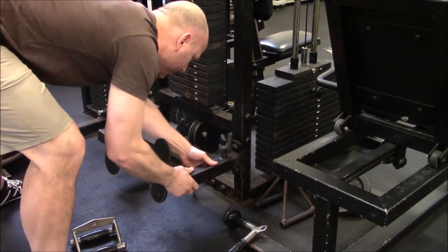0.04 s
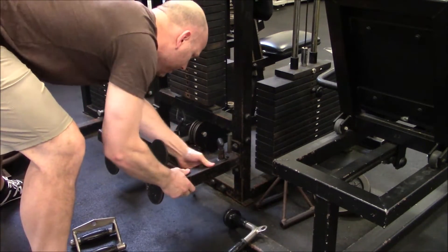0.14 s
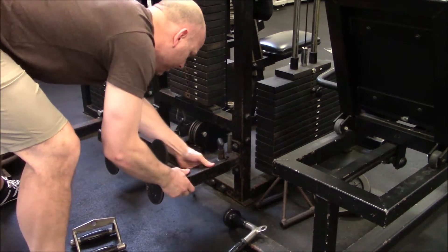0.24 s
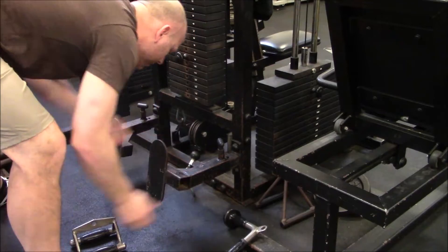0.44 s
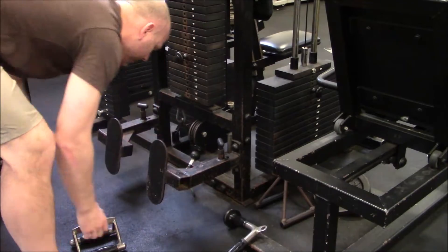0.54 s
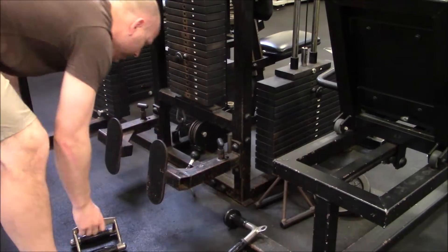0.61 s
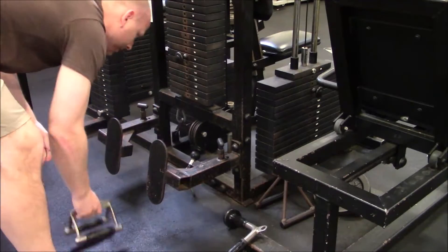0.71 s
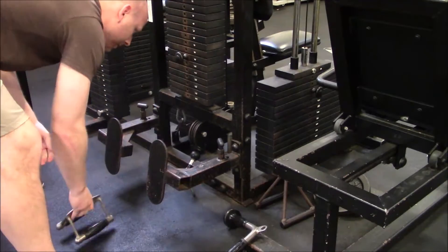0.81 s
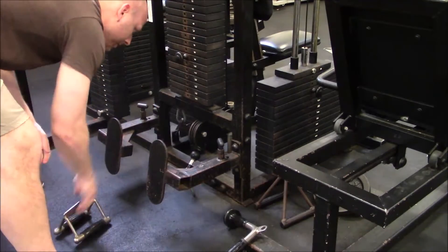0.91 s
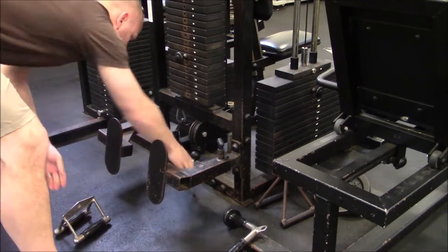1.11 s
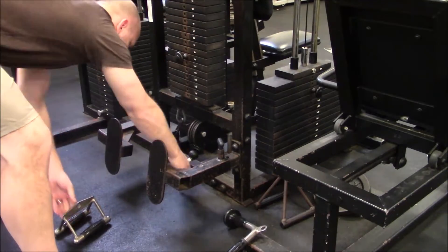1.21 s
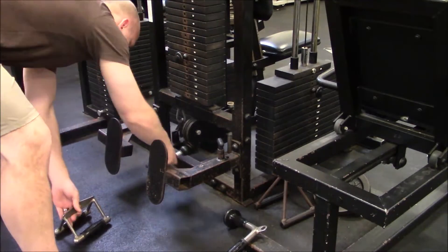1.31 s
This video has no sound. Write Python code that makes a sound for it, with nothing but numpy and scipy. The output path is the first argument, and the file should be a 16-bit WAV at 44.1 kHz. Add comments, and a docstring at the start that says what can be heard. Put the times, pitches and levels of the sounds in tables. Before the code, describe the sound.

One loud, rattling metal clank rings out nearby in a gym as a weight machine's bar scrapes and drops home. A quieter bump of a handle on the rubber floor and faint clinks follow over steady, low-level ventilation.

```python
"""In a gym, over steady ventilation, a steel bar on a weight machine is knocked, scrapes and squeaks,
then drops home with a loud, rattling clank. The blow sets the frame ringing and the room answers.
A cable handle bumps twice on the rubber floor, which dulls it to a clack, and small fittings tick.
Each hit is a short burst of noise plus the fading tones of the part that was struck."""
import sys
import numpy as np
from scipy import signal
from scipy.fft import rfft, irfft
from scipy.io import wavfile
from scipy.ndimage import uniform_filter1d

SR = 44100
rng = np.random.default_rng(int(sys.argv[2]) if len(sys.argv) > 2 else 0)


def wrap_up_sound(samples):
    """Save the sound to the file named by the first command line argument, as 16-bit audio."""
    columns = np.atleast_2d(samples).T
    # keep every value between -1 and 1, then stretch to whole-number steps
    tamed = np.clip(columns, -1, 1)
    steps = np.round(tamed * 32767).astype(np.int16)
    wavfile.write(sys.argv[1], SR, steps)


N = 59535
T = np.arange(N) / SR
HZ = np.fft.rfftfreq(N, 1 / SR)


def amp(db):
    """Turns decibels into a gain."""
    return np.exp(np.asarray(db) * np.log(10) / 20)


def curve(hz, values):
    """Joins a few points into a curve over all frequencies."""
    return np.interp(np.log(HZ + 1), np.log(np.asarray(hz) + 1), values)


def noise(colour):
    """Noise of level 1; its colour says how strong the lows and highs are next to each other."""
    x = irfft(rfft(rng.standard_normal(N)) * amp(curve(*np.transpose(colour))), N)
    return x / x.std()


def envelope(start, rise, fade):
    """Builds up for `rise` seconds, then drops 60 dB every `fade` seconds."""
    out, first = np.zeros(N), max(int(start * SR), 0)
    t = np.maximum(T[first:first + int((rise + 2 * fade) * SR)] - start, 0)
    out[first:first + len(t)] = np.minimum(t / rise, 1) * amp(-60 * np.maximum(t - rise, 0) / fade)
    return out


def burst(start, db, colour, rise, fade):
    """The brief, noisy shaking from one hit."""
    return amp(db) * noise(colour) * envelope(start, rise, fade)


def tail(start, db, colour, decay):
    """Countless tones and echoes blur into noise; each band builds and dies at its own speed."""
    spectrum, centres = rfft(noise(colour)), [row[0] for row in decay]
    return amp(db) * sum(irfft(spectrum * curve(centres, band), N) * envelope(start, rise, fade)
                         for band, (_, rise, fade) in zip(np.eye(len(decay)), decay))


def ring(start, db, tones, rise, waver=.7):
    """The clear tones of struck metal; echoes make each one waver."""
    out, steps, drift_s = np.zeros(N), T[::128], .03
    for hz, level, fade in tones:
        jitter = rng.standard_normal((2, len(steps)))
        drift = signal.lfilter([1], [1, -np.exp(-steps[1] / drift_s)], jitter)
        drift = uniform_filter1d(drift, size=5)
        echoes = (drift[0] + 1j * drift[1]) / drift.std() / np.sqrt(2)
        wobble = (1 + waver * echoes) / np.hypot(1, waver)  # its size sets level, its angle shifts phase
        phase = 2 * np.pi * (hz * T + rng.random()) + np.interp(T, steps, np.unwrap(np.angle(wobble)))
        swell = np.interp(T, steps, abs(wobble))
        out += amp(db + level) * swell * np.sin(phase) * envelope(start, rise, fade)
    return out


def repeat(rows, sound):
    """Plays one sound at each row of t/s, level/dB."""
    return sum(amp(db) * np.pad(sound, (round(s * SR), 0))[:N] for s, db in rows)


def low_cut(x, hz, order=4):
    """Takes the bass away."""
    return signal.sosfilt(signal.butter(order, hz, "highpass", fs=SR, output="sos"), x)


# colour of the moving air, and its stereo width (side compared with middle): f/Hz, level/dB
AIR_COLOUR = [(25, -28.5), (50, -20), (85, -13), (125, -4), (170, -1), (230, 0.5), (500, 0.5), (800, -2.5),
              (1100, -6.5), (2300, -13), (3700, -14), (4600, -20), (6500, -18), (10000, -22.5),
              (16000, -25)]
AIR_WIDTH = [(30, -11.5), (150, -22), (500, -15), (2000, -8.5), (6000, -7.5), (15000, -14.5)]
def ventilation():
    """Air rushes softly and steadily, a little different in each ear."""
    mid = noise(AIR_COLOUR)
    side = irfft(rfft(noise(AIR_COLOUR)) * amp(curve(*np.transpose(AIR_WIDTH))), N)
    return amp(-57) * np.array([mid + side, mid - side])


# colour of the weight plates' long ring: f/Hz, level/dB
PLATE_COLOUR = [(60, -39), (250, -7), (540, 10), (900, 3), (1300, 4), (2200, -4), (3200, -7), (3750, -7),
                (4600, -17.5), (5850, -2), (7200, -10.5), (7650, -10), (8100, -7.5), (9500, -12),
                (15000, -22.5)]
# how it dies away: f/Hz, rise/s, fade/s
PLATE_DECAY = [(297.7, 0.032, 0.89), (1570, 0.093, 0.63), (5830, 0.035, 1.265), (14000, 0.044, .75)]
def plates(start, db):
    """The weight plates ring on in the room after being moved or hit."""
    return tail(start, db, PLATE_COLOUR, PLATE_DECAY)


# when the bar is knocked: t/s, level/dB
KNOCKS = [(0.0197, -26.5)]
# colours of the knock and of its echo: f/Hz, level/dB
KNOCK_COLOUR = [(60, -38), (400, -36), (1000, -24), (1900, 3), (2800, 5.5), (3600, -1), (5000, 5),
                (9000, -5.5), (13200, 1), (16000, -13)]
KNOCK_ECHO = [(60, -49), (200, -9.5), (380, -0.5), (700, 1.5), (1300, 0), (1600, -1.5), (1860, 13.5),
              (2060, 0.5), (2290, 8), (2900, -1), (3700, 0.5), (4700, -9.5), (8500, -3.5), (13000, -21),
              (16000, -22.5)]
# how the room's echo dies away: f/Hz, rise/s, fade/s
ROOM_DECAY = [(149.3, 0.061, 1), (453, 0.065, 0.61), (1500, 0.0012, 0.22), (4000, 0.0035, 0.3),
              (8000, .004, 0.16), (15000, .004, .27)]
# the bar's own tones: f/Hz, level/dB, fade/s
BAR_TONES = [(1320, -46, 0.46), (1836, -27.5, 0.085), (1905, -42.5, .22), (2250, -35, .09),
             (2470, -38, 0.091), (3490, -25, 0.026), (4300, -54.5, 0.3), (8240, -35, 0.044),
             (10030, -47.5, 0.19), (10700, -52.5, .28), (11560, -53, .11), (11960, -54, .22),
             (12960, -33, 0.035)]
def knock():
    """A light knock makes the bar ring and the room answer."""
    tones = ring(KNOCKS[0][0], db=0, tones=BAR_TONES, rise=.0022)
    hit = burst(0, 0, KNOCK_COLOUR, rise=.0012, fade=.031)
    return tones + repeat(KNOCKS, hit + tail(0, -5.5, KNOCK_ECHO, ROOM_DECAY))


# steel rubbing on steel: t/s, length/s, first f/Hz, last f/Hz, level/dB
SQUEAKS = [(0.051, 0.055, 3880, 4110, -46.5), (0.0655, 0.013, 3340, 3730, -39.5),
           (0.173, 0.0065, 3350, 3400, -33), (.176, 0.017, 3980, 4600, -40.5),
           (.188, 0.015, 3000, 2735, -38.5)]
def squeaks():
    """Steel sticks and slips very fast, making short chirps with a shaky pitch."""
    out = np.zeros(N)
    for start, length, first_hz, last_hz, db in SQUEAKS:
        progress = np.clip((T - start) / length, 0, 1)
        waver = uniform_filter1d(rng.standard_normal(N), size=60)
        hz = (first_hz + (last_hz - first_hz) * progress) * (1 + .016 * waver / waver.std())
        swell = 2 * np.sqrt(progress * (1 - progress))
        out += amp(db) * swell * np.sin(2 * np.pi * np.cumsum(hz) / SR)
    return out


# where the sliding bar catches: t/s, relative level/dB, fade/s
SCRAPES = [(.067, -38, 0.034), (.1648, -35, .025), (0.1705, -34.5, 0.03), (0.177, -40.5, 0.105),
           (.189, -38, .12), (0.1993, -24, 0.045)]
# colour of a scrape: f/Hz, level/dB
SCRAPE_COLOUR = [(100, -34), (700, -2.5), (1700, -0.5), (2400, -3), (3000, -4), (3450, 6.5), (4300, -4),
                 (5500, -9.5), (6750, 0), (7800, -8.5), (9500, -8.5), (12500, -12.5), (16000, -21.5)]
def scrapes():
    """Each catch of the sliding bar gives a short rasp."""
    return sum(burst(s, db + 2, SCRAPE_COLOUR, rise=.0025, fade=fade) for s, db, fade in SCRAPES)


# two hard hits, then the bounces: t/s, level/dB
CLANKS = [(.2045, -5.5), (.2062, -6.5), (.2100, -22), (.2222, -19.5), (.2247, -20), (.2283, -17.5),
          (.2350, -23), (.2420, -20), (.2490, -17.5)]
# colours of a hit, a bounce, the machine's blurred ring and the thump: f/Hz, level/dB
HIT_COLOUR = [(60, -27.5), (300, -25), (600, -12), (1100, -4), (2300, -3.5), (4200, 1.5), (6500, 6.5),
              (10000, 2), (13800, 3), (15200, -2)]
BOUNCE_COLOUR = [(60, -33.5), (300, -32.5), (1200, 8.5), (4500, 7.5), (5900, 13), (7800, 8), (10000, -18),
                 (15500, 5.5)]
BODY_COLOUR = [(40, -55.5), (130, -48), (230, -22), (450, -6), (750, -9.5), (1050, -11), (1300, 0.5),
               (1800, -5.5), (2750, -5), (3150, -8.5), (3800, -7), (5050, -10), (5500, -0.5), (5950, 6),
               (6350, -3), (6750, 1), (7250, -8.5), (7600, 4), (8100, -11), (8700, -3.5), (10500, -7.5),
               (13000, -7.5), (14200, -13.5), (15000, -9.5), (15800, -16)]
THUMP_COLOUR = [(30, -29.5), (55, -22), (110, -31.5), (200, -4.5), (280, 0.5), (450, 4), (900, -12.5),
                (3000, -34)]
# how the blurred ring dies away: f/Hz, rise/s, fade/s
BODY_DECAY = [(150, 0.053, 0.25), (450, 0.037, 0.26), (1278, 0.033, 0.38), (3000, 0.02, 0.33),
              (5900, 0.025, 0.44), (10030, 0.026, 0.48), (14680, 0.013, 0.5)]
# low tones of the weight and clear tones of the frame: f/Hz, relative level/dB, fade/s
WEIGHT_TONES = [(250, -43, .09), (290, -34, .1), (446, -27, .17)]
FRAME_TONES = [(525, -37, .9), (790, -37, .8), (944, -35, .45), (1254, -28, .42), (1298, -28, .45),
               (2235, -50, 1.5), (2774, -32, .36), (2828, -32, .36), (3445, -34, .32), (3656, -49.5, 2.2),
               (3692, -40, .7), (3859, -30, .38), (5734, -28, .46), (5955, -27, .48), (6103, -27, .38),
               (7547, -26, .32), (8612, -28, .33), (8975, -29, .33), (9673, -31, .34), (11165, -33, .3)]
def clank():
    """Steel lands on steel and rattles; the machine rings and the weight settles with a thump."""
    start = CLANKS[0][0]
    hits = sum(burst(s, db, HIT_COLOUR, rise=.0002, fade=.018) for s, db in CLANKS[:2])
    rattle = sum(burst(s, db, BOUNCE_COLOUR, rise=.002, fade=.016) for s, db in CLANKS[2:])
    crash = burst(start, -17, HIT_COLOUR, rise=.00068, fade=.088)
    body = tail(start, -12.5, BODY_COLOUR, BODY_DECAY) + plates(start, db=-27.5)
    thump = burst(.232, -35, THUMP_COLOUR, rise=.0061, fade=.058)
    thump += ring(.218, db=-1, tones=WEIGHT_TONES, rise=.039)
    frame = ring(start, db=.6, tones=FRAME_TONES, rise=.0099)
    return low_cut(hits + rattle + crash, hz=435) + body + thump + frame


# when the handle touches the floor (the first two blend into one bump): t/s, relative level/dB
BUMPS = [(0.9348, -37), (0.938, -51), (0.9592, -26.5)]
# colours of a bump and of its echo: f/Hz, level/dB
BUMP_COLOUR = [(40, -18), (300, -9), (520, -7), (850, -3), (1250, -1), (1900, 3), (2700, -1), (3800, -18),
               (6000, -14), (8000, -31), (12000, -31), (14400, -31), (16000, -36)]
BUMP_ECHO = [(40, -37.5), (200, -7), (360, 1.5), (800, -12.5), (1500, -4), (2400, -7.5), (3800, -23.5),
             (6500, -28), (9000, -39), (13500, -32.5), (14400, -28), (15500, -36)]
# how that echo dies away: f/Hz, rise/s, fade/s
BUMP_DECAY = [(150, 0.017, 0.54), (400, 0.011, 0.42), (1500, 0.0039, 0.42), (4040, 0.0084, 0.19),
              (15000, 0.036, 0.18)]
# the handle's short tones, and the faint, long tones of the machine's frame heard as the handle lands: f/Hz,
# relative level/dB, fade/s
CLACK_TONES = [(330, -12, 0.025), (520, -1.5, 0.016), (1280, -1, 0.0066), (1765, -1.5, 0.012),
               (2180, -8, 0.013), (2500, -9, 0.0033)]
LINGERING_FRAME_TONES = [(2235, -64, 2.2), (3657, -73, 2.4)]
def handle():
    """The handle clacks dully on rubber, the ceiling throws the clack back, and the frame still rings faintly."""
    bumps = sum(burst(s, db - 5, BUMP_COLOUR, rise=.00031, fade=.016) for s, db in BUMPS)
    room = repeat(BUMPS, tail(0, -16, BUMP_ECHO, BUMP_DECAY))
    clacks = repeat(BUMPS, ring(0, db=-.5, tones=CLACK_TONES, rise=.00024, waver=0))
    ceiling = repeat([(.027, -20)], clacks)
    faint_ring = ring(BUMPS[-1][0], db=0, tones=LINGERING_FRAME_TONES, rise=.0022)
    return low_cut(bumps + clacks + ceiling + room, hz=173) + faint_ring


# when the fittings tick: t/s, level/dB
TICKS = [(1.2572, -57), (1.2755, -52), (1.2770, -39), (1.2887, -41), (1.3115, -55), (1.3215, -52)]
# colour of a tick: f/Hz, level/dB
TICK_COLOUR = [(200, -26.5), (1800, -7), (2500, -4), (3400, 0), (5200, -4.5), (6900, 7), (8500, -9),
               (11500, -6), (13200, 3), (14500, 6), (16500, -2)]
# tones of a small fitting: f/Hz, relative level/dB, fade/s
CLINK_TONES = [(3400, -8.5, 0.028), (6700, -18, 0.11), (6830, -11, 0.11), (7080, -12, 0.073)]
def fittings():
    """Small metal parts tick and clink brightly, with a trace of room echo."""
    clink = ring(0, db=-3, tones=CLINK_TONES, rise=.0003)
    room = tail(0, -25, TICK_COLOUR, ROOM_DECAY)
    ticks = sum(burst(s, db, TICK_COLOUR, rise=.00034, fade=.015) for s, db in TICKS)
    return ticks + repeat(TICKS, clink + room)


def widen(mid, width):
    """The first echoes reach left and right a little differently."""
    echoes = rng.standard_normal(N) * envelope(.002, rise=.004, fade=.06)
    echoes /= np.linalg.norm(echoes)
    side = irfft(rfft(mid) * rfft(echoes) * amp(curve(*np.transpose(width))), N)
    return np.array([mid + side, mid - side])


# stereo width of the clank and of the small sounds (side compared with middle): f/Hz, level/dB
CLANK_WIDTH = [(30, -21.5), (150, -47.5), (400, -53), (3600, -65.5), (5200, -17), (15000, -17.5)]
SMALL_WIDTH = [(30, -22.5), (400, -32.5), (2500, -40), (6000, -28.5), (15000, -19)]
def scene():
    """The metal sounds sit near the middle, a little wider in the treble, over the ventilation."""
    loud = widen(clank(), CLANK_WIDTH)
    already_ringing = plates(start=-.026, db=-43.5)  # from being handled
    bar = low_cut(already_ringing + knock() + scrapes() + squeaks(), hz=160)
    return loud + widen(bar + handle() + fittings(), SMALL_WIDTH) + ventilation()


def record(dry):
    """The tallest peaks clip, adding a bright crack but no bass; then the very top treble is cut."""
    overshoot = dry - np.clip(dry, -.72, .72)
    clipped = dry - low_cut(overshoot, hz=500, order=2)
    treble_cut = signal.firwin(511, cutoff=15900, window=("kaiser", 9), fs=SR)
    return signal.oaconvolve(clipped, treble_cut[None], "same")


dry = scene()
out = record(dry)
wrap_up_sound(out)
```